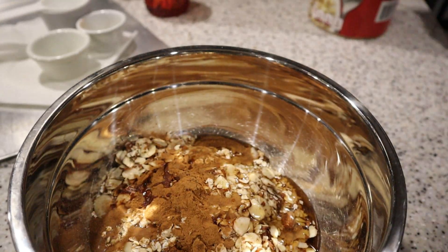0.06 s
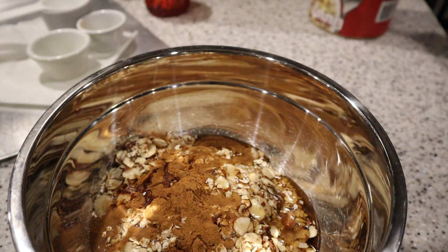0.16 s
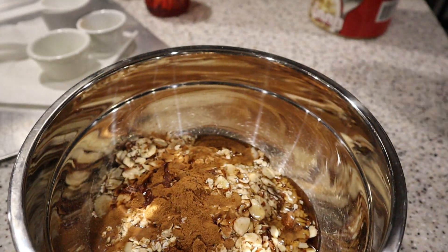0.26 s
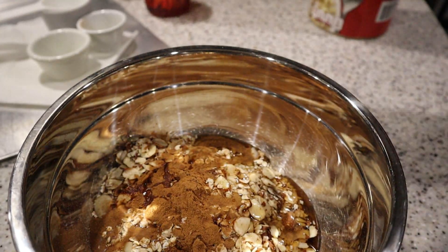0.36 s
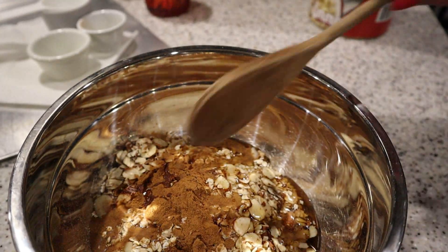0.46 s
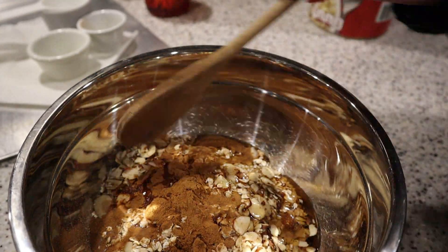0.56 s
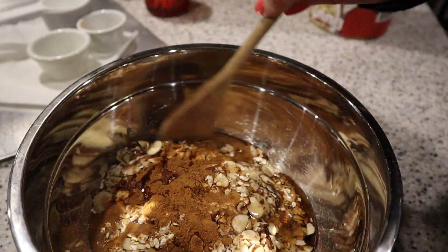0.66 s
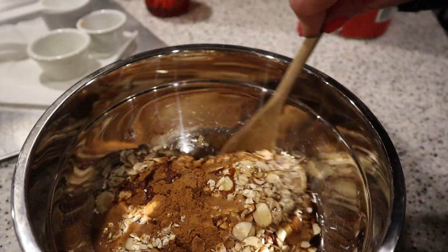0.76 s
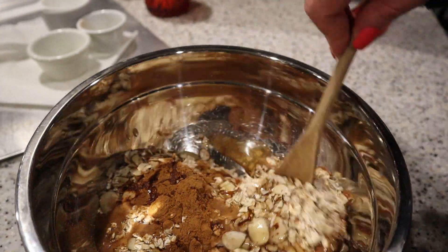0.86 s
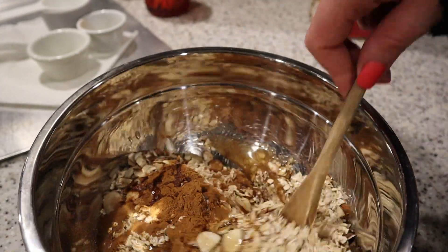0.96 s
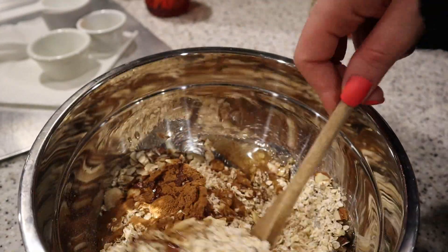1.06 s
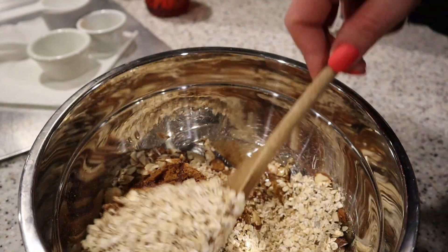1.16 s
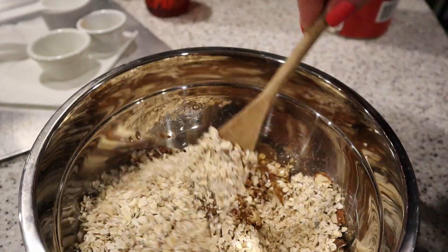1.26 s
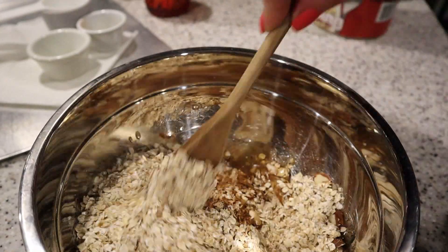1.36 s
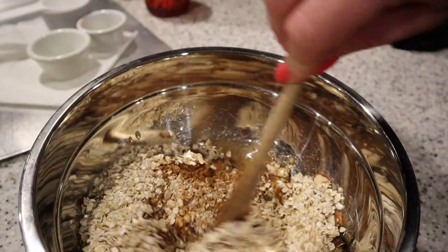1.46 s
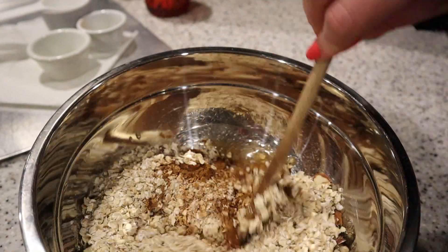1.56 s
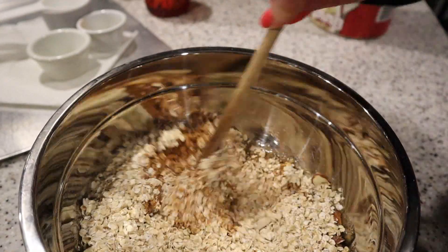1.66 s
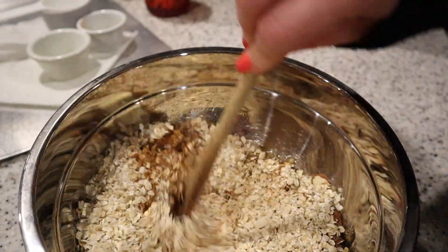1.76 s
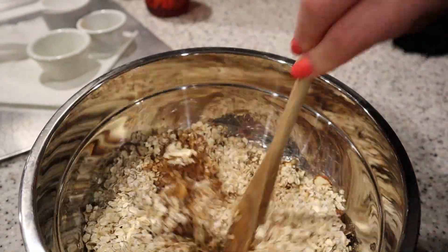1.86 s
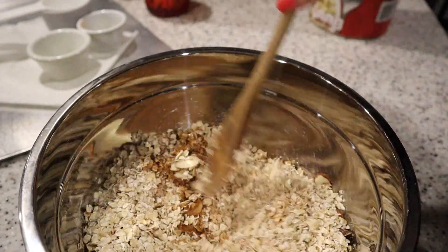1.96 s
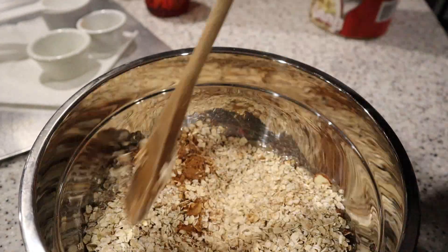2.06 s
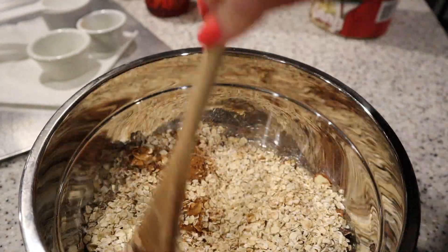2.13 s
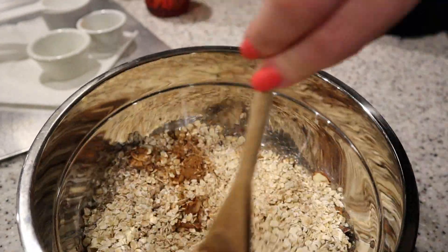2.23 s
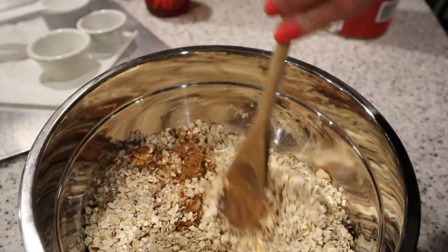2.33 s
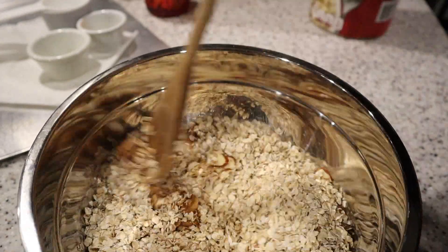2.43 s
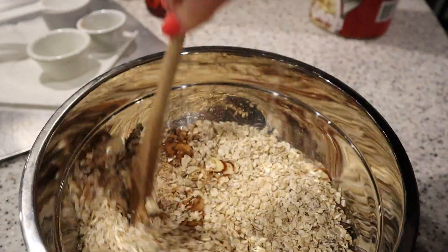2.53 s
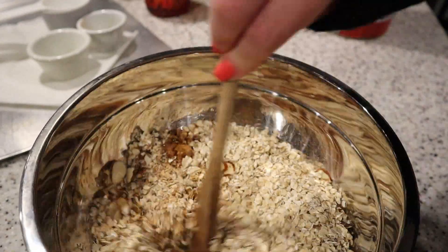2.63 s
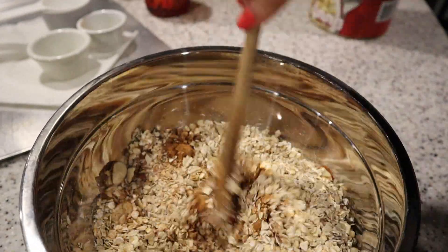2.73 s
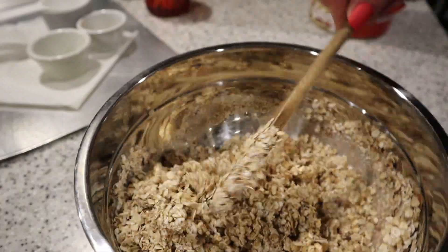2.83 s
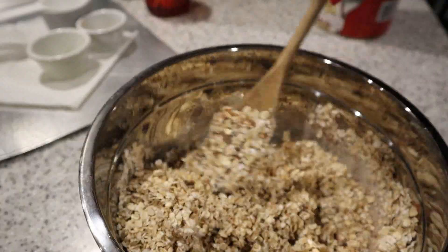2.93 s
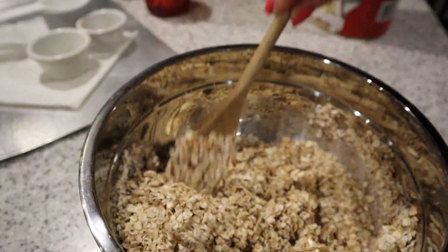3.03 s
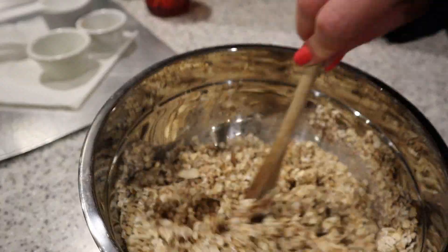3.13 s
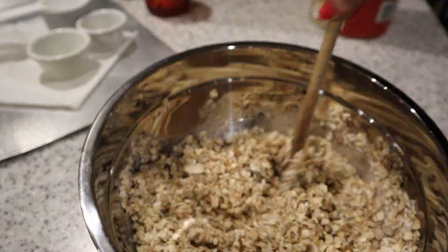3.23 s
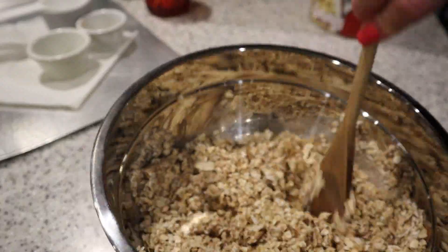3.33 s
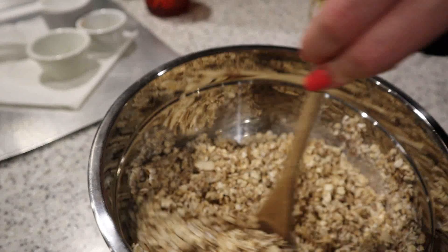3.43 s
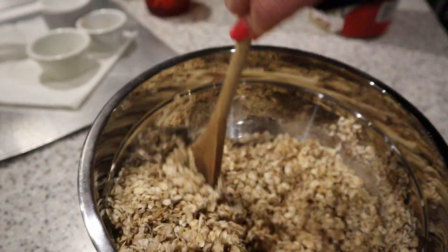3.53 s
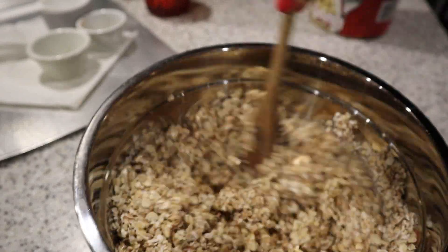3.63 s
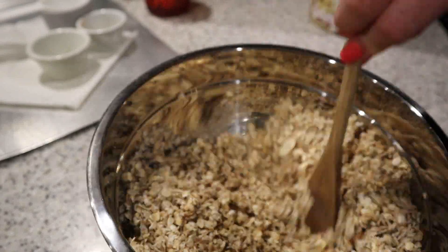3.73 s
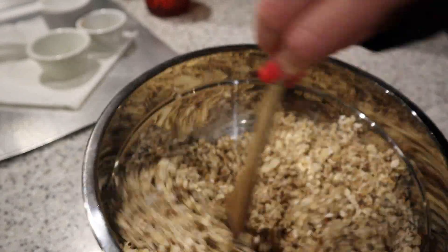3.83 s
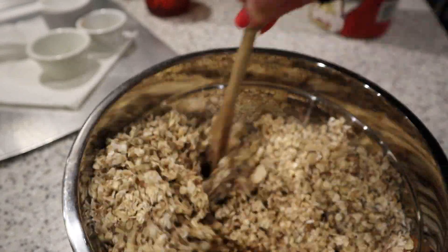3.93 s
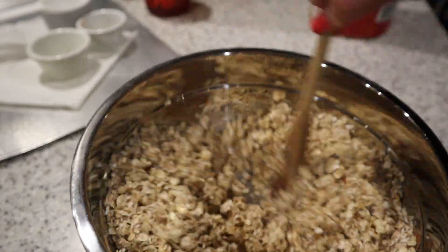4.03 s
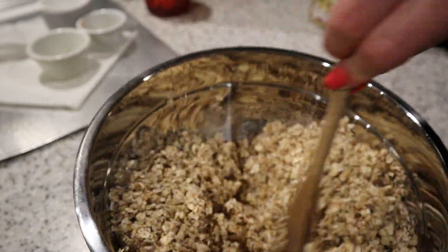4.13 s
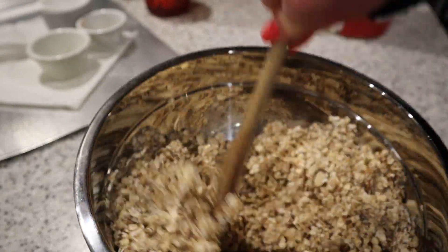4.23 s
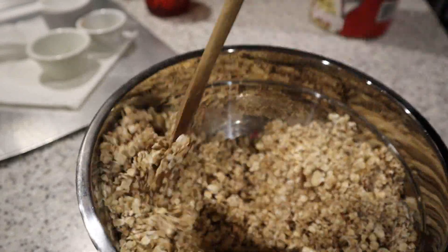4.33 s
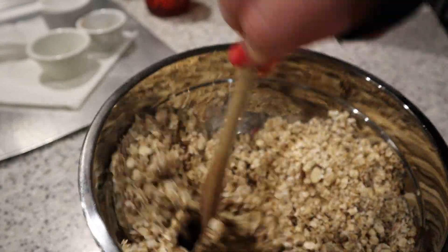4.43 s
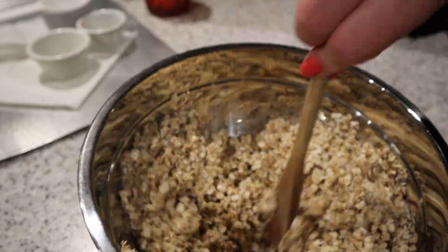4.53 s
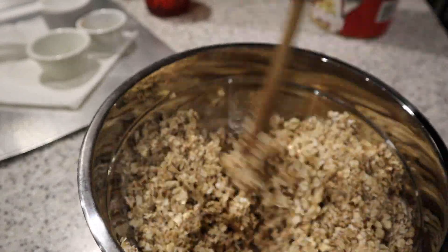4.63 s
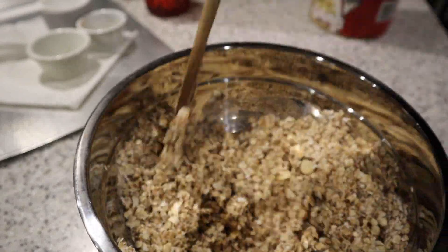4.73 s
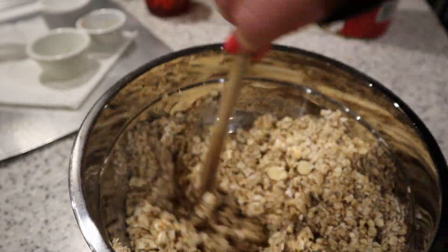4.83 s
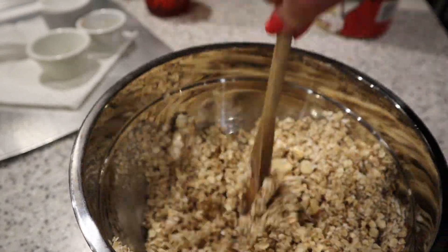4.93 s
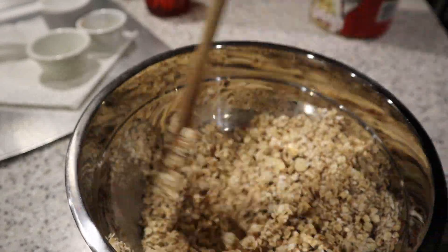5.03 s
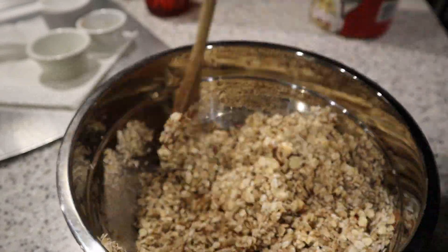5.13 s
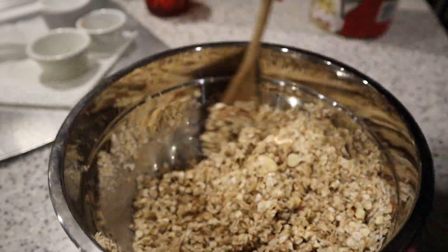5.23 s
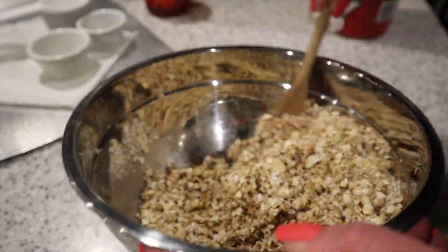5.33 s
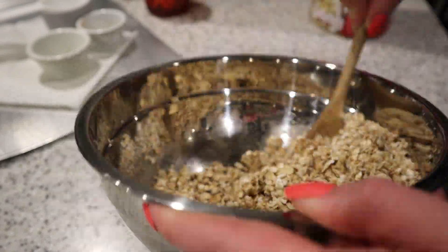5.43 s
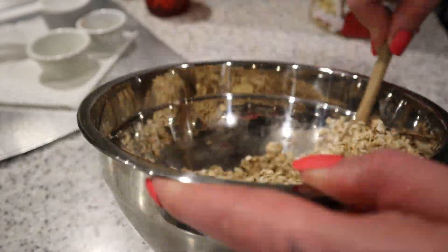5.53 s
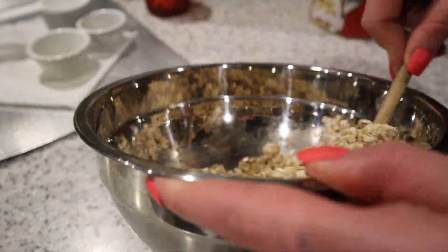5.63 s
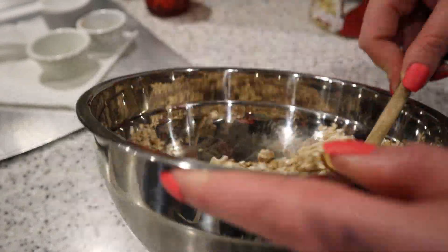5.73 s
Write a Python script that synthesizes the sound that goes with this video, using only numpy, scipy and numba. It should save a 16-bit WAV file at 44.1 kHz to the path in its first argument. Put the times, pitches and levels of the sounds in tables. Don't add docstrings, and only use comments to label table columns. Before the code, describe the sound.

A quiet kitchen with low fridge and air hum, heard very close to a steel bowl by a stereo microphone. At 0.1 s the bowl knocks faintly; soft cloth brushes follow near 0.3 and 0.5 s. At 0.7 s a wooden spoon clacks hard on the wall, with a brief metallic ring choked within about 0.15 s by the sticky mix. Stirring then runs to the end in uneven strokes, several per second: airy, scratchy flake rustle, duller crunch and short wooden scrapes on damped steel. Bright clusters of clicks and snaps come near 1.3, 1.8, 2.5 and 2.9 s. The bowl thumps at 2.4 s, slams with a woody tick at 3.0 s, and knocks again at 3.4 and strongly at 3.8 s. Fuller rustling and frequent knocks fill 3.7 to 4.3 s, sharp cracks hit at 4.1 and 4.8 s, then lighter knocks and scraping continue until about 6 s.

```python
import sys
import numpy as np
from scipy import signal
from scipy.fft import rfft, irfft
from scipy.io import wavfile
from scipy.ndimage import uniform_filter1d
from numba import njit

SR = 44100
rng = np.random.default_rng(int(sys.argv[2]) if len(sys.argv) > 2 else 0)


def materialize(psi):
    bounded = np.clip(np.atleast_2d(psi).T, -1, 1)
    quanta = np.round(bounded * 32767).astype(np.int16)
    wavfile.write(sys.argv[1], SR, quanta)


def boost_factor(decibels):
    exponent = np.asarray(decibels, float) / 20
    return 10 ** exponent


N = 254898

# f/Hz, density/dB
ROOM_SUM = [(20, -5.5), (130, -2.5), (390, -13), (1000, -19), (2680, -23.5), (3600, -28), (12000, -40),
            (16000, -88)]
ROOM_DIFF = [(12, -62), (20, -33), (285, -1.5), (1070, -6), (1230, -7.5), (2630, -8), (3950, -9.5),
             (13000, -24)]
# t/s, half length/s, level/dB
SLEEVE = [
    (0.295, 0.02, -56),
    (0.482, 0.033, -61),
]
# f/Hz, density/dB
FLAKE_SUM = [(2000, -50), (4500, -18), (6500, -7), (9000, -6), (11000, -8.5), (12500, -12), (16000, -27)]
FLAKE_DIFF = [(2000, -37), (4500, -11), (6500, -3), (9000, 1), (11000, 4.5), (13000, -4.5), (16000, -25)]
# fullest t/s, rise/s, fall/s, rustle level/dB, crunch over rustle/dB
TUMBLES = [(.80, 0.076, 0.24, -43, -0.5), (1.05, 0.13, 0.21, -45, -21), (1.22, 0.12, 0.19, -62, 10.5),
           (1.58, 0.17, 0.32, -48.5, 1), (1.78, 0.1, 0.09, -44.5, -9), (1.9, 0.07, 0.13, -44.5, -0.5),
           (2.23, 0.026, 0.19, -46, -3), (2.40, 0.18, 0.21, -55.5, 9), (2.52, 0.049, 0.088, -45.5, -12),
           (2.66, 0.091, 0.17, -43, -1.5), (3.25, 0.087, 0.13, -45.5, 1.5), (3.53, 0.082, 0.078, -42, -12),
           (3.76, 0.17, 0.16, -39, -3), (3.95, 0.13, .12, -42, -3.5), (4.11, 0.099, 0.15, -39.5, 0),
           (4.27, .1, 0.11, -47, -7), (4.56, 0.064, 0.08, -41.5, 1), (4.65, 0.054, 0.06, -44, 5.5),
           (4.90, 0.042, 0.097, -43.5, -3.5), (5.0, 0.068, 0.043, -47, -6), (5.24, 0.03, 0.14, -46.5, -17),
           (5.37, 0.058, 0.1, -43, -0.5), (5.49, 0.044, 0.16, -45.5, -1.5), (5.68, 0.2, 0.27, -45, -2.5)]
# t/s, hold/s, ring level/dB, crunch over ring/dB, ring f/Hz
SLUMPS = [(0.712, 0.032, -39, -17, 7500), (1.18, 0.053, -39.5, -16, 7440), (1.314, 0.068, -33, -7, 7500),
          (1.444, 0.037, -36.5, -15, 7700), (1.759, 0.034, -33, -25, 7650), (2.549, .012, -43, -13, 7900),
          (2.213, 0.045, -37.5, -6.5, 7100), (2.501, 0.013, -34, -9, 7660), (2.584, 0.054, -37, -2, 7700),
          (2.855, 0.009, -41, -12, 7670), (2.935, 0.013, -37.5, -21, 7700), (3.042, 0.018, -43, -2.5, 7900),
          (3.103, 0.023, -52.5, -11, 7700), (3.713, 0.06, -30, -15, 8050), (4.077, 0.1, -38, -7, 7800),
          (4.447, 0.012, -32.5, -13, 8140), (4.798, 0.019, -31.5, -19.5, 7700),
          (5.197, 0.005, -39, -5.5, 8100), (5.227, 0.055, -37.5, -26, 7850), (5.603, 0.019, -53, 8, 8000)]
# t/s, peak level/dB, ring f/Hz, left minus right/dB
FLICKS = [(0.946, -26, 8050, -0.5), (1.3174, -26, 7740, 1.5), (1.3254, -17, 7290, 4),
          (1.3354, -22, 7250, 3), (1.3464, -29, 7310, 8), (1.3648, -20.5, 7460, 4), (1.3773, -19, 7280, 7),
          (1.3914, -24, 7200, -1), (1.4434, -26, 8010, 6), (1.4834, -25, 8010, 3.5),
          (1.4967, -36.5, 7300, 29), (1.5104, -33, 8040, 0.5), (2.0368, -35, 7740, 0.5),
          (2.0941, -31, 7700, 10), (2.4877, -16.5, 8300, 3), (2.4934, -22, 7700, -1), (2.5, -14, 8000, -7),
          (2.5047, -18, 7680, 1), (2.5079, -14, 8600, -4), (2.5184, -17, 8260, 3), (2.5284, -25, 7490, 0),
          (2.5354, -21, 8000, 1.5), (2.5554, -17, 7900, 3), (2.5674, -26, 7240, 1), (2.835, -28, 7310, 2.0),
          (2.8549, -21, 7600, -2), (2.9122, -15, 8200, -5), (3.0455, -33, 8010, 1.5), (3.073, -30, 8100, 4),
          (3.1393, -33, 7930, 1.0), (4.3874, -25.5, 8000, 2), (4.4314, -24, 8240, 3),
          (4.4524, -21, 8300, -2), (4.4584, -24, 8280, -1.0), (4.4694, -26, 8070, 5),
          (4.799, -23, 8100, -1), (5.1053, -32, 7880, 4)]
# t/s, peak level/dB, ring f/Hz, t60/s
CONTACTS = [(0.102, -42, 1100, .006), (1.3078, -31, 1300, .006), (1.3255, -28, 1290, 0.0074),
            (1.4505, -22, 8000, 0.0088), (2.149, -33, 7800, .005), (2.8553, -25, 7640, .005),
            (3.0622, -24, 7900, 0.0087), (3.298, -34, 600, .012), (3.54, -33, 1210, 0.013),
            (4.799, -19, 7950, 0.0054), (4.8048, -24, 7800, .006), (4.821, -27, 7700, .006),
            (4.8255, -27, 7400, .005), (4.828, -27, 7500, .005), (4.8328, -22, 7300, 0.0055),
            (0.9995, -35, 1800, .003), (5.1985, -26, 7000, .003), (0.904, -31, 3100, .005),
            (2.4873, -26, 4960, 0.0043), (2.549, -26, 8000, .004), (2.7348, -32, 2900, .005),
            (2.9127, -15.5, 8100, .004), (2.918, -24, 7600, .005), (2.9255, -32, 7700, .006),
            (2.934, -29, 7000, .005), (2.942, -28, 7800, .005), (2.961, -30, 7500, .005),
            (3.0127, -26, 9000, 0.0018), (3.0127, -29, 6200, .003), (3.1383, -41, 2930, .005),
            (3.4607, -31, 2710, .005), (4.2663, -23.5, 1900, 0.0059), (4.294, -35, 1600, .004),
            (4.388, -42, 3770, .004), (4.427, -29, 4550, 0.0028), (4.4456, -27.5, 3880, 0.0069),
            (4.7985, -36, 5000, .002), (4.7995, -36, 1200, 0.0036), (5.0625, -31, 2900, .004),
            (5.0625, -30, 5500, .002), (5.6068, -19, 3700, 0.0054), (5.6073, -26, 6200, .003)]
# t/s, peak level/dB, ring f/Hz, left minus right/dB
SNAPS = [(1.188, -28, 7400, 3), (1.3252, -29, 7240, 1), (1.335, -21, 7340, 3), (1.3784, -21, 7280, 0.5),
         (1.451, -15, 7900, 4), (1.4733, -22, 7900, 14), (1.769, -14, 8100, 5), (1.783, -13.5, 7850, -2),
         (2.149, -25, 8080, 0), (2.183, -22.5, 7200, 5), (2.2015, -22, 8700, 0), (2.21, -17, 7400, 3),
         (2.488, -29, 8350, -3), (2.494, -19.5, 7650, -17), (2.5065, -12, 8020, -2),
         (2.549, -12.5, 8000, 0), (2.857, -15, 7460, 0), (2.902, -29, 7950, 13), (2.9118, -9, 7640, 8),
         (2.535, -22, 8000, -2), (3.0123, -16.5, 7600, 2), (3.061, -30, 8000, 14), (3.774, -16, 8500, -5),
         (3.9863, -24, 7800, 0), (4.09, -9.5, 8300, 1), (4.446, -16, 7960, -3), (4.799, -9.5, 7900, 0),
         (4.822, -28, 7400, 6), (5.199, -17.5, 7100, 4.5)]
# t/s, peak level/dB, ring f/Hz, left minus right/dB, dull body level/dB
NUTS = [(0.7262, -22, 7500, 11, -13), (0.845, -15, 8340, 3, -16), (0.9022, -17, 7840, -2, -6),
        (1.3052, -25, 7300, 1, -6), (1.3657, -27, 7400, -3, -9), (2.119, -26, 7600, -3, -12),
        (2.581, -21, 7710, 3, -10), (4.4278, -20, 7900, 3, -9.5), (4.8733, -23, 7900, 5, -14),
        (5.062, -27.5, 7340, 3, -3), (5.609, -27.5, 7860, -5, 12)]
# t/s, length/s, f/Hz, width/Hz, level/dB
SQUEALS = [
    (2.588, 0.022, 3900, 250, -35),
    (3.048, 0.022, 2900, 200, -41),
    (3.048, .022, 2450, 250, -52),
    (3.02, .012, 2900, 400, -47),
    (1.612, .06, 1410, 900, -37),
    (1.695, 0.018, 1200, 300, -39),
    (4.441, .022, 5300, 2800, -34.5),
]
# hardest t/s, rise/s, fall/s, scrape level/dB, sticky drag over scrape/dB
SCRAPES = [(.76, 0.084, 0.15, -42, -1.5), (1.0, 0.15, 0.16, -47.5, -3), (5.23, 0.048, 0.096, -53, 8.5),
           (1.63, 0.22, 0.061, -39, -16), (1.71, 0.028, 0.038, -43, -10), (1.85, 0.16, 0.082, -44.5, -1),
           (1.98, 0.13, 0.1, -41, -13.5), (2.26, 0.03, 0.02, -45.5, 0), (2.42, 0.17, 0.13, -42.5, -7),
           (2.64, 0.068, 0.084, -42, -2.5), (2.73, 0.025, 0.085, -40, -17), (3.05, 0.063, 0.02, -50, 8.5),
           (3.28, 0.17, 0.13, -43.5, -5), (3.5, 0.092, 0.14, -39, -11.5), (3.77, 0.11, 0.17, -39.5, -7),
           (3.93, 0.084, 0.21, -43.5, -2.5), (4.15, 0.063, 0.11, -36.5, -25), (4.24, 0.13, 0.11, -43.5, -9),
           (4.56, 0.09, 0.07, -42.5, 1.5), (4.66, 0.056, 0.091, -41, -7.5), (4.88, 0.026, 0.03, -45.5, 2.5),
           (4.99, 0.089, 0.06, -37, -11), (5.5, 0.24, 0.07, -51, 5.5), (5.7, 0.28, 0.17, -45, -1.5)]
# f/Hz, width/Hz, level/dB
LOADED_WALL = [(670, 37, -1.5), (1230, 130, 3.5), (1700, 150, -12), (2300, 1700, -4.5), (3120, 1130, -6.5)]
# f/Hz, level/dB, t60/s
ROCKING_BASE = [(89.5, -14, 0.094), (138, -4.5, 0.16), (206.2, -2, 0.08), (324, -9.5, 0.098),
                (260, -12, 0.059), (294, -14.5, 0.049)]
# t/s, thump level/dB, upper base modes/dB, spoon tick level/dB, tick f/Hz
KNOCKS = [(0.1, -34, -9, -41.5, 695), (0.999, -44, -6, -35, 673), (1.308, -42, -13, -36, 1450),
          (1.318, -53, -15, -38, 2400), (1.325, -52, -15, -33, 1290), (1.835, -37, 5.5, -44, 670),
          (2.364, -17.5, -6.5, -21.5, 1290), (2.651, -29, -3, -37, 1420), (3.04, -14, -15, -33, 596),
          (3.073, -20, -15, -38, 600), (3.29, -37, -12, -33, 1810), (3.4215, -46, -8, -32, 600),
          (3.425, -13.5, -8.5, -47, 600), (3.74, -49, -5, -36, 1230), (3.784, -8, -9, -17.5, 1170),
          (3.7936, -22.5, 1.5, -45, 650), (3.825, -23, -10, -43, 650), (3.839, -15.5, -24, -50, 643),
          (3.912, -19.5, -6, -24, 638), (4.0652, -24, -17, -27.5, 780), (4.1042, -14, -7, -17.5, 1660),
          (4.18, -17.5, -16, -33, 2300), (4.267, -54, -7, -48, 1700), (4.542, -22.5, -6.5, -26, 680),
          (4.888, -22, -11.5, -29.5, 620), (4.933, -29, -18, -32, 690), (5.199, -23, -6, -23, 657)]
# t/s, thump level/dB, upper base modes/dB, tick level/dB, tick f/Hz
SLAM = [
    (2.997, -11.5, 0.5, -11.5, 985),
    (3, -38, 0, -16, 1480),
    (3.0067, -21, 3.5, -33, 900),
]
# f/Hz, level/dB, t60/s
FREE_BOWL = [(262, -14, 0.24), (543, -6, 0.05), (680, -6, 0.14), (780, -5, 0.49), (793, -23, 0.28),
             (880, -24, 0.13), (1130, -16, 0.15), (1313, -5.5, 0.29), (1334, -11, 0.12), (1510, -10, 0.064),
             (1696, -13, 0.16), (2896, -34, .2), (3970, -19, 0.19), (4102, -23, 0.6), (4150, -26, 0.1)]


def level(x, db):
    return x * boost_factor(db) / np.sqrt(np.mean(x ** 2))


def noise():
    return rng.standard_normal(N)


def colour(x, points):
    hz, db = np.transpose(points)
    grid = np.maximum(np.fft.rfftfreq(4096, 1 / SR), 1)
    cepstrum = irfft(np.log(boost_factor(np.interp(np.log(grid), np.log(hz), db))))
    cepstrum[1:2048] *= 2
    cepstrum[2049:] = 0
    return signal.fftconvolve(x, irfft(np.exp(rfft(cepstrum))))[:len(x)]


def band(x, hz, width):
    return signal.lfilter(*signal.iirpeak(hz, hz / width, fs=SR), x)


def band2(x, hz, width):
    return band(band(x, hz, width), hz, width)


@njit
def sweep(x, hz, width):
    y, b, l = np.empty(len(x)), 0., 0.
    for i in range(len(x)):
        g, k = np.tan(np.pi * hz[i] / SR), width / hz[i]
        v = (b + g * (x[i] - l)) / (1 + g * (g + k))
        b, l, y[i] = 2 * v - b, l + 2 * g * v, k * v
    return y


def ring(x, modes, stretch=0.92):
    total = 0
    for hz, db, t60 in modes:
        pole = np.exp(2j * np.pi * hz / SR - np.log(1000) / (t60 * stretch * SR))
        total = total + boost_factor(db) * signal.lfilter([1], [1, -pole], x).imag
    return total


def push(ms):
    force = np.zeros(20000)
    k = max(int(ms * SR / 1000), 2)
    force[:k] = np.sin(np.pi * (np.arange(k) + .5) / k) * np.pi / (2 * k)
    return force


def unload(x):
    return signal.sosfilt(signal.butter(3, 75., "high", fs=SR, output="sos"), x)


def walk(rate):
    k = int(SR / rate)
    held = np.repeat(rng.standard_normal(N // k + 1), k)
    slewed = uniform_filter1d(uniform_filter1d(held, k), k)[:N]
    return slewed / slewed.std()


def uneven(rate, spread_db):
    return (rng.random(N) < rate / SR) * boost_factor(spread_db * np.minimum(rng.exponential(size=N), 4))


def grains(rate, spread_db, t60):
    decay = np.exp(-2 * np.log(1000) / (t60 * SR))
    power = signal.lfilter([1], [1, -decay], uneven(rate, 2 * spread_db))
    return level(np.sqrt(power + 1e-9), 0)


def ports(total, diff, pan_db=0.):
    return np.array([(total + diff) * boost_factor(pan_db / 2), (total - diff) * boost_factor(-pan_db / 2)])


def pair(make, diff_db):
    return ports(level(make(), 0), level(make(), diff_db))


def add(out, s, x):
    i = int(s * SR)
    out[:, i:i + x.shape[1]] += x[:, :N - i]


def swells(rows, gains):
    t = np.arange(0, N, 32)[:, None] / SR
    s, hold, rise, fall = np.array(rows)
    before = np.maximum(s - t, 0) / rise
    after = np.maximum(t - s - hold, 0) / fall
    shape = boost_factor(-20 * before ** 2 - 20 * after ** 2)
    return [np.interp(np.arange(N) / SR, t[:, 0], shape @ g) for g in gains]


def power_db(*parts):
    return 10 * np.log10(sum(parts))


def kitchen():
    swell_db = np.interp(np.arange(N) / SR, [0, .1, .3, .45, .6, .7], [-1.0, 0, 3.5, 2.5, 0.5, -1.0])
    total = level(colour(noise(), ROOM_SUM), -48.5)
    diff = level(colour(noise(), ROOM_DIFF), -49)
    return boost_factor(swell_db) * ports(total, diff)


def sleeve():
    s, half, db = np.transpose(SLEEVE)
    power, = swells([s, 0 * s, half, half], [boost_factor(2 * db)])
    return np.sqrt(power) * pair(lambda: band(noise(), 11500.0, 7000.), 3.)


def heap():
    mouth_hz, mouth_over_rustle_db, slump_air_db = 8050, 5, -21.5
    still_air, still_crunch = boost_factor(2 * -66), boost_factor(2 * -59.5)
    s, rise, fall, db, crunch_db = np.transpose(TUMBLES)
    air, crunch = swells([s, 0 * s, rise, fall], [boost_factor(2 * db), boost_factor(2 * (db + crunch_db))])
    s, hold, db, crunch_db, hz = np.transpose(SLUMPS)
    slump_rise_s, slump_fall_s = 0.0027 + 0 * s, 0.031 + 0 * s
    slump, grit, pull = swells([s, hold, slump_rise_s, slump_fall_s],
                               [boost_factor(2 * db), boost_factor(2 * (db + crunch_db)), hz * boost_factor(2 * db)])
    roll = boost_factor(2 * mouth_over_rustle_db) * air + still_air
    air_db = power_db(air, boost_factor(2 * slump_air_db) * slump, still_air)
    ring_hz = (mouth_hz * roll + pull) / (roll + slump)
    return air_db, power_db(roll, slump), ring_hz, power_db(crunch, grit, still_crunch)


def rustle():
    air_db, ring_db, ring_hz, crunch_db = heap()
    slips = grains(rate=1400.0, spread_db=2.3, t60=0.05) * boost_factor(1.52 * walk(25.11))
    air_sum = level(colour(slips * noise(), FLAKE_SUM), 3.17)
    air_diff = level(colour(slips * noise(), FLAKE_DIFF), 7.9)

    def mouth():
        flutter = slips * boost_factor(1.5 * walk(40.)) * noise()
        return sweep(sweep(flutter, ring_hz, 1300.0), ring_hz, 1300.0)

    def crunch():
        return sum(boost_factor(3 * walk(16.)) * band2(slips * noise(), hz, 2400.0) for hz in (3000., 3900., 5000.))

    return (boost_factor(air_db) * ports(air_sum, air_diff) + boost_factor(ring_db - 5.0) * pair(mouth, 3.7)
            + boost_factor(crunch_db - 5.0) * pair(crunch, 0.96))


def crackle():
    def pings():
        total = 0
        for hz in 1500 * 1.2 ** np.arange(9):
            hits = uneven(40., 3.7) * boost_factor(2.9 * walk(12.))
            total = total + ring(hits, [(hz, 0, .009)])
        return total
    crunch_db = heap()[3]
    return boost_factor(crunch_db - 5.) * pair(pings, -1.5)


def flicks():
    out, t = np.zeros((2, N)), np.arange(900) / SR
    t60 = 0.01
    for s, db, hz, pan_db in FLICKS:
        hit = rng.standard_normal((2, len(t))) * boost_factor(-60 * t / 0.0026)
        ping = np.array([ring(h, [(hz, 0, t60), (1.08 * hz, -6, t60)]) for h in hit])
        edge = boost_factor(-2.5) * band2(hit, 7800.0, 9000.)
        click = ping / np.abs(ping).max(axis=1, keepdims=True) + edge
        port_db = db - 4 + np.array([[0.], [2.5]])
        add(out, s + .0008, ports(*click * boost_factor(port_db), pan_db))
    return out


def contacts():
    out = np.zeros((2, N))
    for s, db, hz, t60 in CONTACTS:
        click = ring(push(.05)[:1500], [(hz, db, t60), (1.45 * hz, db - 15.0, 0.68 * t60)])
        late = np.roll(click, 4)
        add(out, s, ports(click, 0.27 * (click - late)))
    return out


def cracks():
    out, t = np.zeros((2, N)), np.arange(6000) / SR
    snaps = grains(rate=1200.0, spread_db=1.5, t60=0.025)
    flakes = [(*row, -35) for row in SNAPS]
    for s, db, hz, pan_db, body_db in flakes + NUTS:
        smaller = snaps[int(s * SR):][:len(t)]
        shape = 0.67 * boost_factor(-60 * t / 0.0033) + 0.35 * smaller
        burst = rng.standard_normal((2, len(t))) * boost_factor(db - 60 * t / 0.065) * shape
        mouth = boost_factor(3.0) * band2(burst, hz, 1140.0)
        air = boost_factor(-9.0) * band2(burst, 8900.0, 6500.0)
        body = boost_factor(body_db + 2.0) * band2(burst, 3600.0, 1150.0)
        port_gain = boost_factor(np.array([[0.], [3.]]))
        add(out, s, ports(*(mouth + air + body) * port_gain, pan_db))
    return out


def squeals():
    out = np.zeros((2, N))
    for s, length, hz, width, db in SQUEALS:
        swell = np.sqrt(np.hanning(int(1.6 * length * SR)))
        tone = band2(rng.standard_normal((2, 8000)), hz, width)[:, -len(swell):]
        total, diff = [swell * level(port, db) for port in tone]
        add(out, s - 0.28 * length, ports(total, diff))
    return out


def spoon():
    still_wall_db, still_drag_db, still_base_db = -59, -60, -50.5
    s, rise, fall, db, drag_db = np.transpose(SCRAPES)
    wall, drag = swells([s, 0 * s, rise, fall], [boost_factor(2 * db), boost_factor(2 * (db + drag_db))])
    wall_db = power_db(wall, boost_factor(2 * still_wall_db))
    drag_db = power_db(drag, boost_factor(2 * still_drag_db))
    base_db = power_db(boost_factor(2 * -9.5) * drag, boost_factor(2 * -13) * wall, boost_factor(2 * still_base_db))
    wall_hz = 1280 + 28 * (wall_db - drag_db)
    return wall_db, wall_hz, drag_db, base_db


def scrape():
    wall_db, wall_hz, drag_db, base_db = spoon()
    slips = grains(rate=450.0, spread_db=1.0, t60=0.1)

    def modes():
        return sum(boost_factor(db + 2.8 * walk(14.)) * band(slips * noise(), hz, width) for hz, width, db in LOADED_WALL)

    def edge():
        return sweep(sweep(slips * noise(), wall_hz, 860.0), wall_hz, 860.0)

    def rumble():
        return unload(ring(boost_factor(3 * walk(20.)) * noise(), ROCKING_BASE, 0.34))

    wall = pair(modes, -3.5) + boost_factor(-7.5) * pair(edge, -9.0)
    drag = pair(lambda: band(slips * noise(), 600.0, 360.0), -9.5)
    return boost_factor(wall_db - 2.0) * wall + boost_factor(drag_db) * drag + boost_factor(base_db) * pair(rumble, -19.0)


def knocks():
    out, t = np.zeros((2, N)), np.arange(12000) / SR
    thump_lag_s = 0.0033
    for s, db, upper_db, tick_db, hz in SLAM + KNOCKS:
        hiss = rng.standard_normal((3, len(t)))
        chatter = 0.02 * hiss[2] * boost_factor(-60 * t / 0.14)
        blow = np.roll(push(3.37)[:len(t)], int(thump_lag_s * SR)) + chatter
        base = ring(blow, ROCKING_BASE[:2]) + boost_factor(upper_db + 9.5) * ring(blow, ROCKING_BASE[2:])
        thump = boost_factor(db - 5.5) * unload(base)
        wood = band(band2(hiss[:2] * boost_factor(-60 * t / .032), hz, 1200.), hz, 1200.)
        tap = ring(-push(0.37)[:len(t)], [(hz, 4, .004), (1900, 0, .005), (670, -18, .08)])
        tick = boost_factor(tick_db) * (tap + 1.8 * wood[0])
        add(out, s, ports(thump + tick, boost_factor(tick_db) * 1.4 * wood[1]))
    return out


def strike():
    out, t = np.zeros((2, N)), np.arange(20000) / SR
    clack_modes = [(1315, 3.5, 0.0047), (2300, -7.5, 0.0041), (5750, -13, 0.0037), (9300, -2.0, 0.0023)]
    clack = unload(ring(-push(.12), clack_modes))
    hiss = rng.standard_normal((2, len(t))) * boost_factor(-60 * t / 0.098)
    splash = [unload(band(n, 670.0, 1050.0)) for n in hiss]

    def choked(modes, s):
        return ring(push(.1), modes, 1.7) * boost_factor(-281 * np.maximum(t - s, 0))

    wall = choked(FREE_BOWL[:6], 0.12) + choked(FREE_BOWL[6:], 0.096)
    rattle_db = 1.2 * walk(70.)[:len(t)]
    total = clack + boost_factor(-22 + rattle_db) * wall + boost_factor(-10.0) * splash[0]
    late = np.roll(total, 4)
    add(out, .7094, ports(total, 0.38 * (total - late) + boost_factor(-6.5) * splash[1]))
    return out


def scene():
    moving = np.arange(N) / SR > .7094
    background = kitchen() + sleeve()
    stirring = moving * (rustle() + crackle() + scrape())
    hits = flicks() + contacts() + cracks() + squeals() + knocks() + strike()
    return background + stirring + hits


def low_pass(x):
    return signal.sosfilt(signal.butter(12, 16470, fs=SR, output="sos"), x)


def record(dry):
    def shelf(x, hz):
        return colour(x, [(hz, 0), (1.08 * hz, -14), (1.44 * hz, -24), (20000, -50)])
    left, right = dry
    total = shelf((left + right) / 2, 12300)
    diff = shelf((left - right) / 2, 13600)
    mix = np.clip(ports(total, diff), -.96, .96)
    return low_pass(mix)


dry = scene()
out = record(dry)
materialize(out)
```